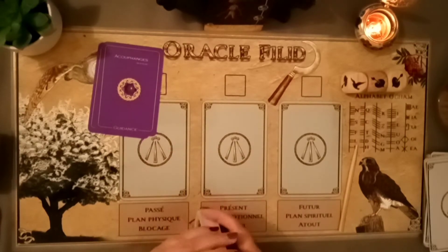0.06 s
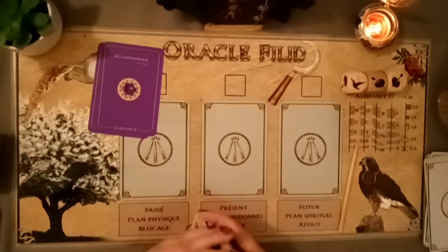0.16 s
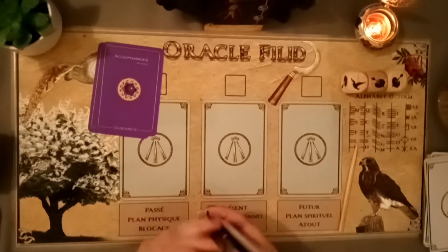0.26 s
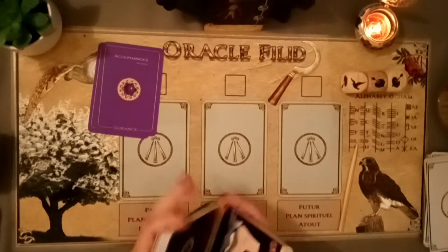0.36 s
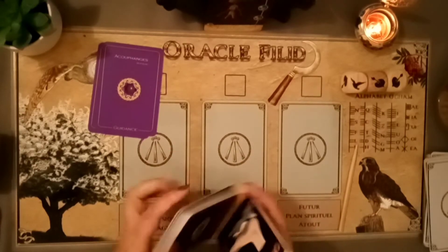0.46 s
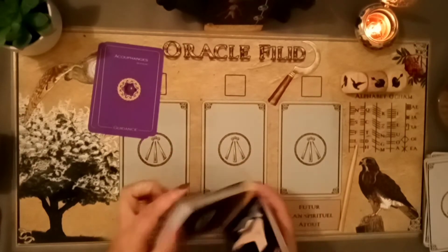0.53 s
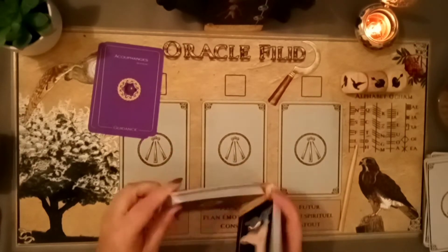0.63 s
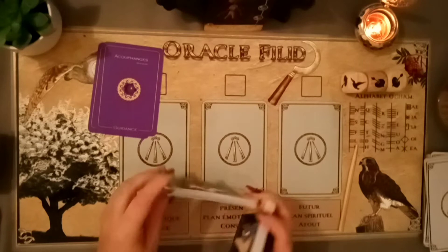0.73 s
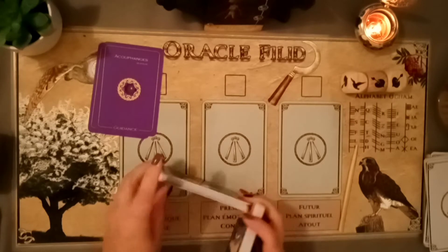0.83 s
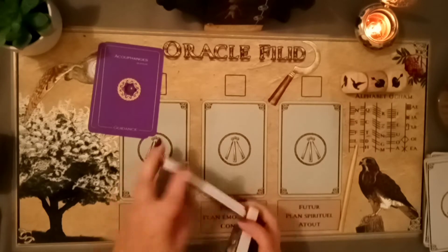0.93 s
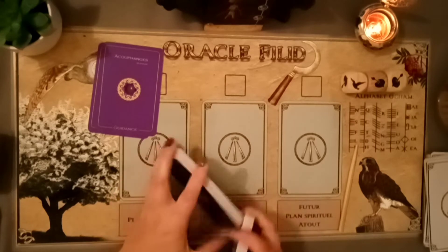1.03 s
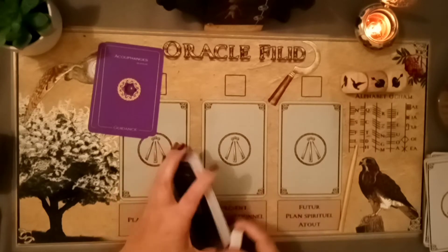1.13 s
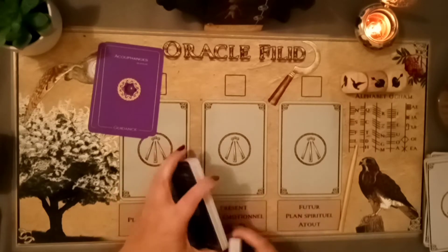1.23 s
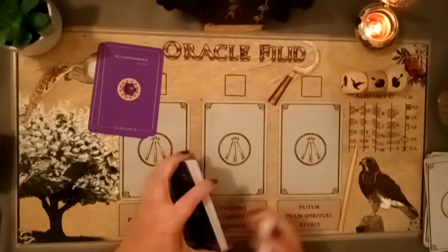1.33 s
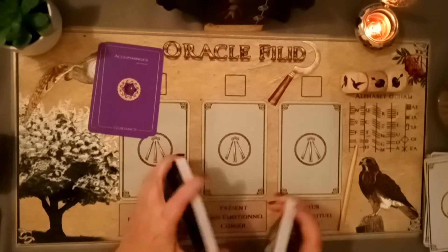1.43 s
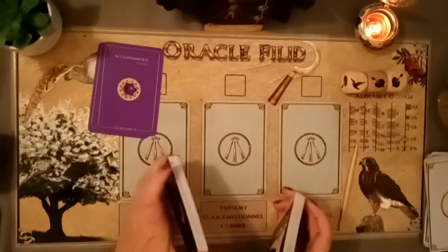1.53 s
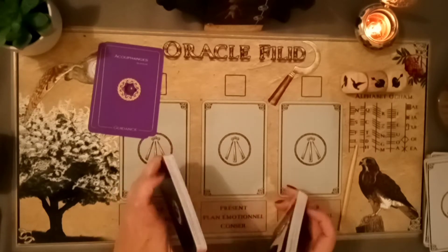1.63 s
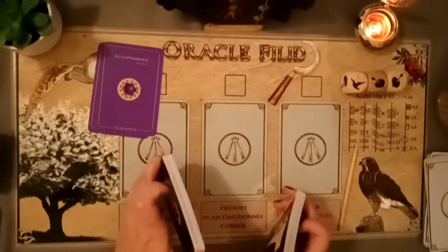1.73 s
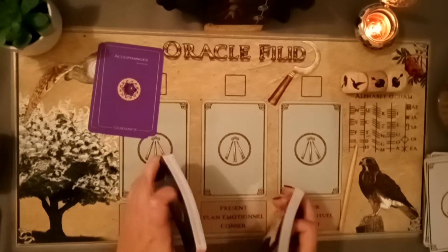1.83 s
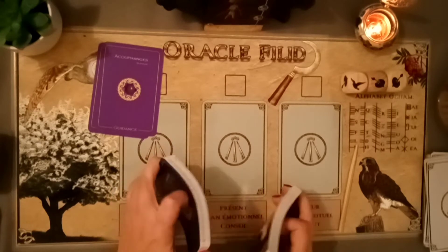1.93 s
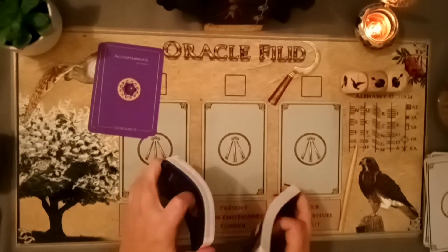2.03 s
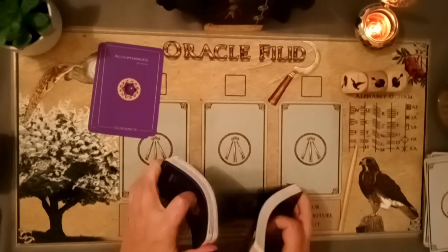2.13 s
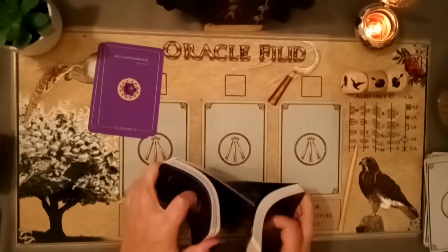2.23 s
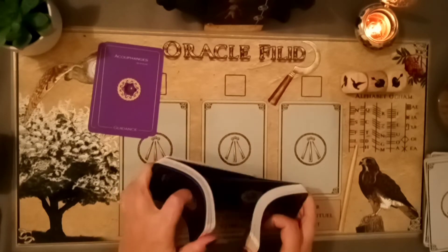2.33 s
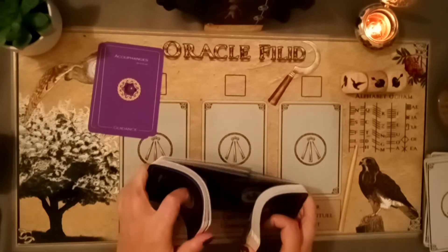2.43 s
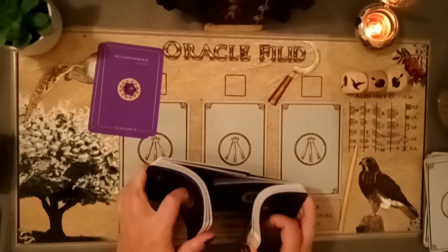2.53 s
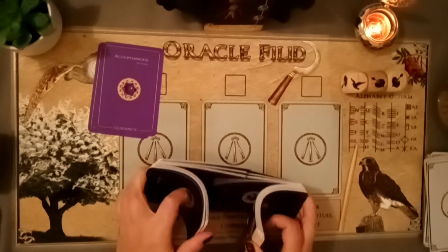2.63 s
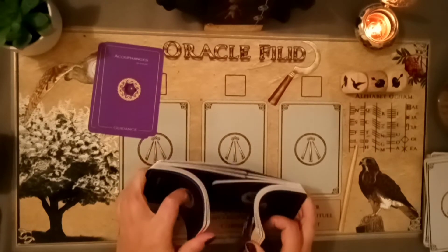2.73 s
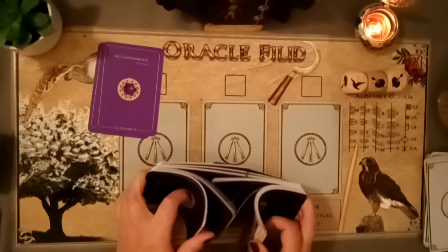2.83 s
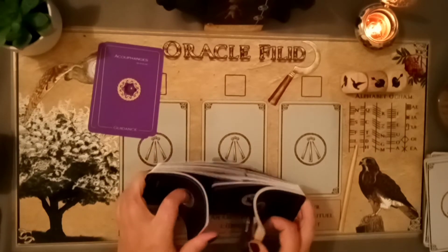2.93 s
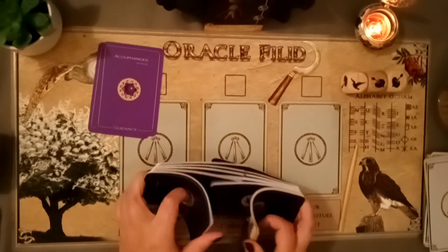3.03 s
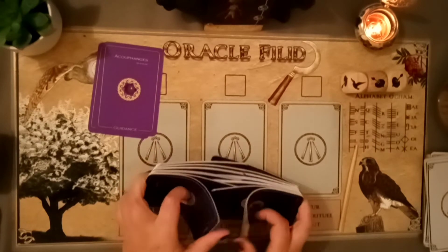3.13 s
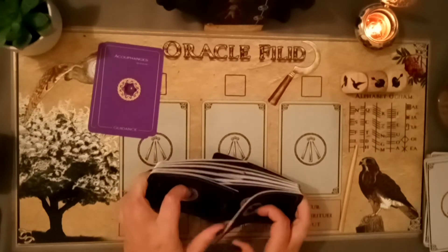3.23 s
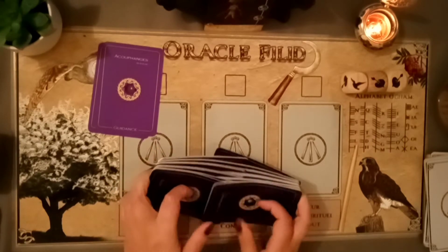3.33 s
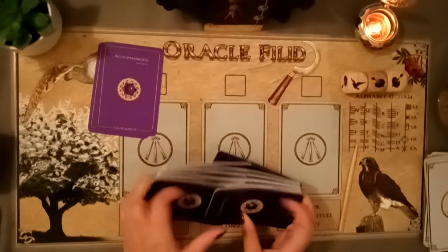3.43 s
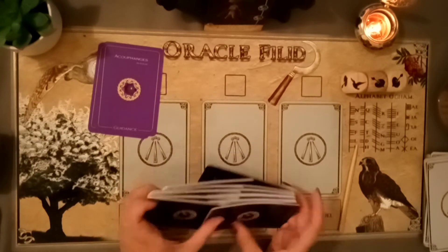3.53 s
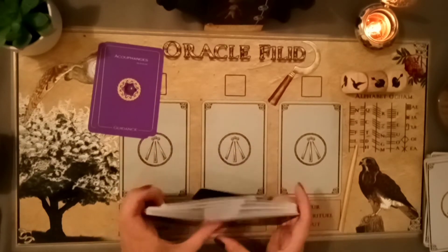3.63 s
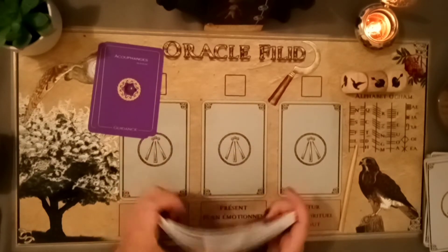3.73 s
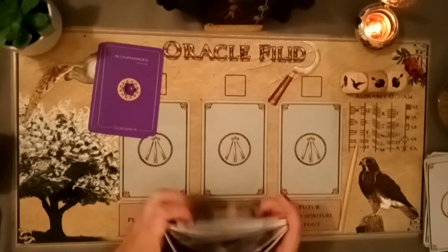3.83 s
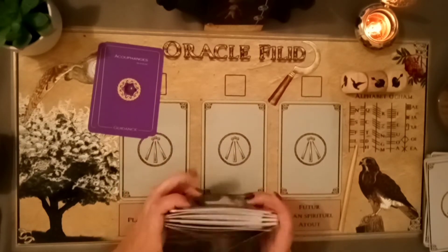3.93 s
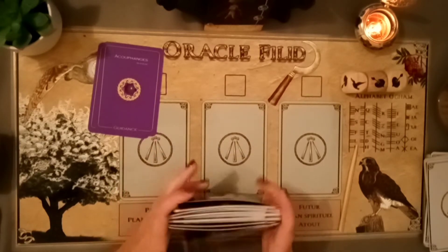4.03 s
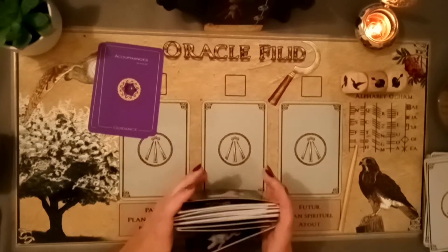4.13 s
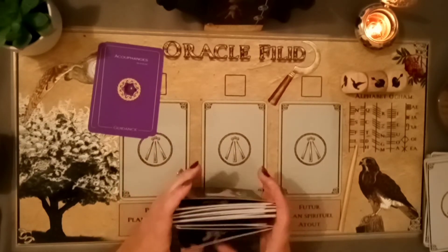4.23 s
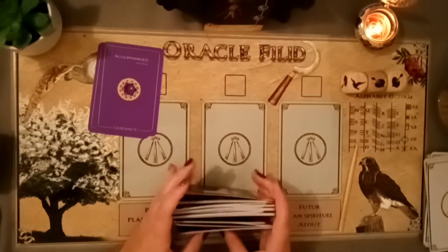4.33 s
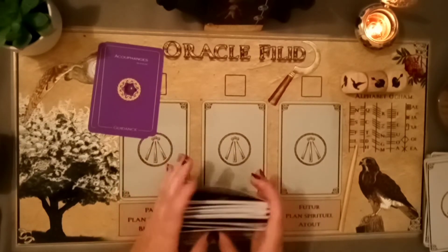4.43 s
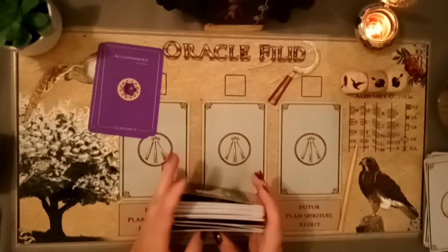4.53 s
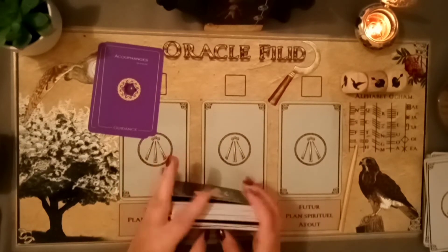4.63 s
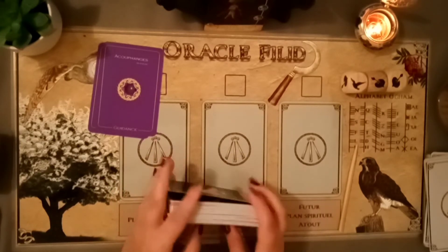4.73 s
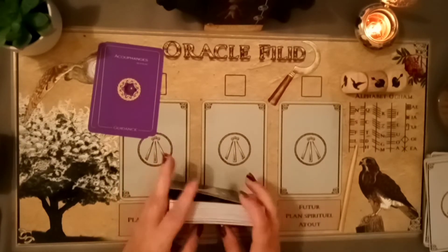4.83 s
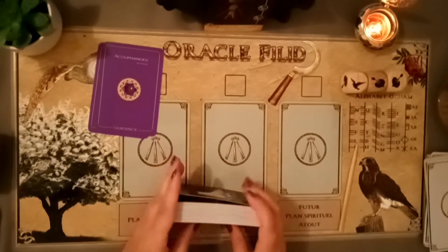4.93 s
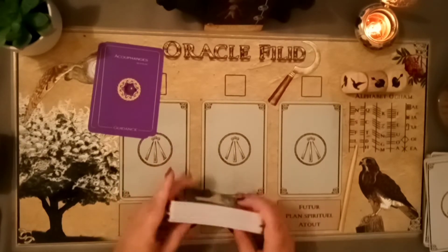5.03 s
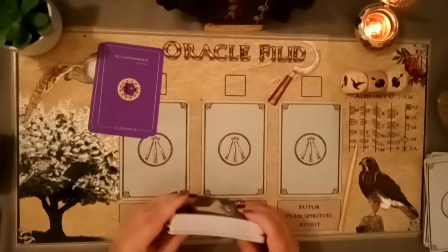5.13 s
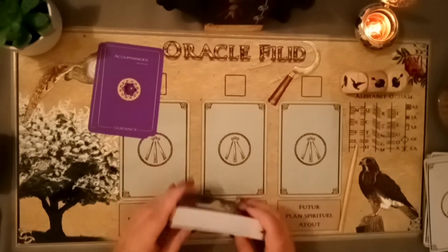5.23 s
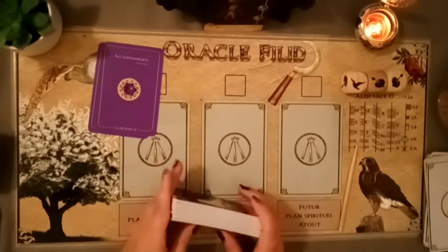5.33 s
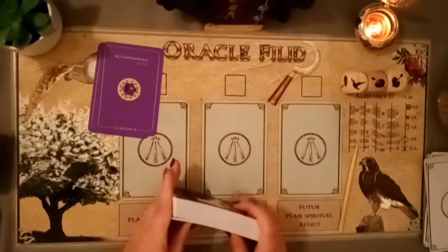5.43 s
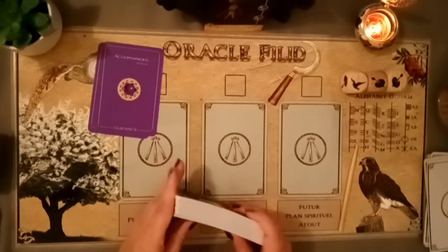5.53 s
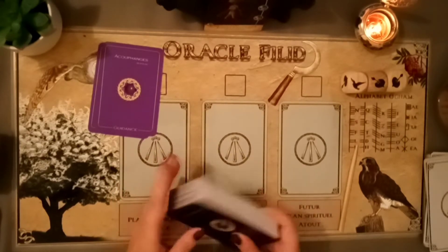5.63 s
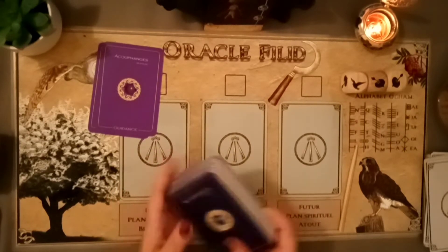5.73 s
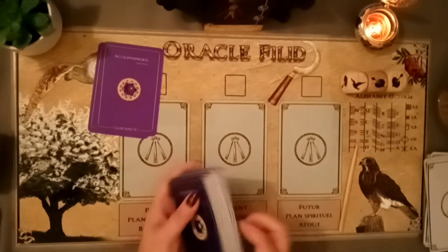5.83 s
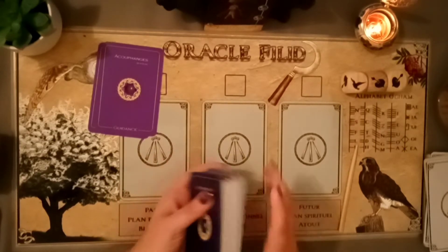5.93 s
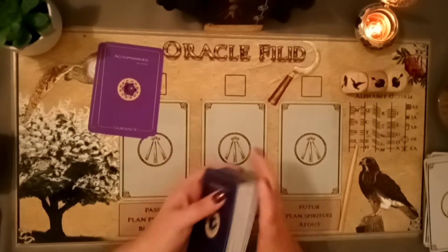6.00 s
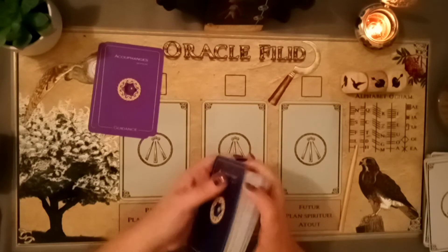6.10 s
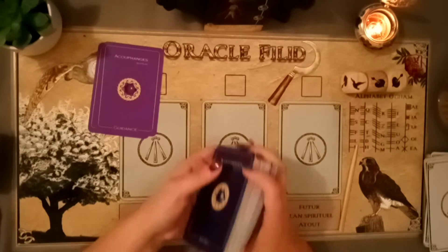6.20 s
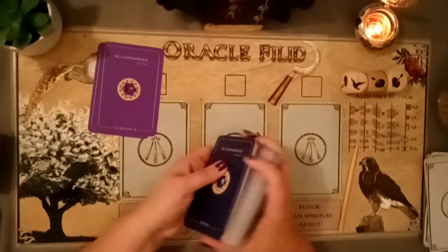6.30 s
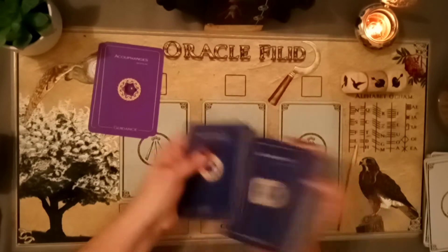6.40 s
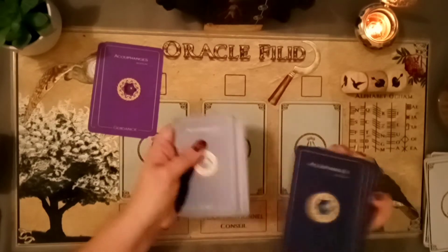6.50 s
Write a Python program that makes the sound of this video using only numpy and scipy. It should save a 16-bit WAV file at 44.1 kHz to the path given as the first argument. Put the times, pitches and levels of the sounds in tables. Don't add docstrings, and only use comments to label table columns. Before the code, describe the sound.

Close microphones above a table catch a card deck being split, riffled and squared. Isolated cracks come first, then a lull with a faint regular mechanical tick on the left, then quick bright crackling with papery rubbing and low wooden thumps. A rustling collapse and several taps follow, then the loudest dull knock, quiet handling, and one crisp snap with a short slide. The small room adds a short, soft reverberation over low hiss.

```python
import sys
import numpy as np
from scipy import signal
from scipy.fft import rfft, irfft
from scipy.io import wavfile
from scipy.ndimage import uniform_filter1d

SR = 44100
rng = np.random.default_rng(int(sys.argv[2]) if len(sys.argv) > 2 else 0)


def unload_wav(signal):
    wavfile.write(
        sys.argv[1],
        SR,
        np.round(np.clip(np.atleast_2d(signal).T, -1, 1) * 32767).astype(np.int16),
    )


def magnitude_from_level(level_db):
    exponent = np.asarray(level_db, float) / 20
    return 10 ** exponent


N = 289296

# frequency in Hz, density in dB per Hz.
HUSH_SPECTRUM = [(22, -13.5), (45, 8.5), (326, 0), (516, -6), (575, -4.5), (1020, -10), (1370, -10),
                 (1790, -11.5), (2690, -10.5), (3250, -15), (3920, -11.5), (14800, -29), (16000, -29)]
# frequency in Hz, likeness [0..1].
HUSH_LIKENESS = [(60, 0.76), (250, 0.16), (600, 0.065), (4000, 0.057)]
HUSH_DB = -69.5
# frequency in Hz, t60 in s.
ROOM_DECAY = [(150, 0.67), (500, 0.41), (1500, 0.31), (5000, 0.23), (13000, 0.18)]
# frequency in Hz, left over right in dB.
PORT_DIFFERENCE = [(60, 3.5), (120, -8.5), (240, -1.5), (480, 1.5), (950, -0.5), (1890, 0.5), (3770, 0),
                   (7520, -6), (15000, 19)]
PORTS_ALIKE_HZ = 350
# frequency in Hz, gain in dB.
MIC_RESPONSE = [(300, -2.5), (2000, -0.5), (4000, 4), (7000, 4), (8500, 0), (14000, -3.5), (15400, -13),
                (16100, -6)]
CUTOFF_HZ = 16600

# first step in s, last step in s, spacing in s (0 for the beat), unevenness in s,
# level in dB.
FOCUS_RUNS = [
    (1.241, 1.3, 0.012, 0.0011, -40.5),
    (1.31, 1.372, 0.01, 0.0031, -38.5),
    (1.435, 1.46, 0.0064, 0.00089, -47),
    (1.497, 6.32, 0, 0.00034, -47.5),
    (1.346, 1.402, 0.0031, 0.0014, -43),
    (6.475, 6.505, 0.017, 0.0014, -38.5),
]
STEP_S = .1602

# start in s, peak in dB.
THUDS = [(0.781, -25), (0.817, -60.5), (1.19, -52.5), (2.209, -36), (2.437, -35), (2.642, -35.5),
         (2.75, -39), (2.923, -35.5), (3.094, -28.5), (3.198, -36), (3.322, -47), (4.103, -41.5),
         (4.368, -28.5), (4.63, -31), (5.2802, -15), (5.29, -18.5), (5.71, -56.5), (6.12, -51.5)]
# frequency in Hz, level in dB, t60 in s.
TABLE_MODES = [(101, -17.5, 0.17), (145, -6, 0.2), (153, 2.5, 0.13), (167.4, 0, 0.13), (217.6, -19.5, 0.4),
               (259, -15, 0.3), (345, -8, 0.25), (442.4, -9.5, 0.11), (520, -15, 0.051), (598, -18, 0.2),
               (725.5, -16, 0.18)]
# start in s, level in dB, swell in s, hold in s.
LOADS = [(.01, -72, .03, 0.27), (0.388, -74, 0.094, 0.12), (0.787, -35.5, 0.004, 0.0011),
         (.84, -48, .02, .005), (0.91, -55.5, .03, 0.012), (1.027, -69, .04, .02),
         (1.132, -61, 0.026, 0.056), (1.233, -65, 0.16, 0.17), (1.652, -78, 0.033, 0.0021),
         (1.81, -69, 0.062, .002), (1.955, -67, 0.054, .002), (2.166, -69, 0.042, 0.033),
         (2.211, -40, 0.01, 0.022), (2.451, -43, 0.1, 0.0025), (2.642, -39.5, 0.059, 0.052),
         (2.765, -43.5, .03, 0.0054), (2.934, -40.5, 0.022, 0.015), (2.994, -39.5, 0.026, .005),
         (3.057, -41, 0.027, .01), (3.1, -39.5, .02, .002), (3.135, -35.5, 0.026, 0.0043),
         (3.212, -38.5, .02, 0.064), (3.325, -39, 0.034, 0.019), (3.468, -65.5, 0.056, 0.23),
         (3.755, -48, 0.064, 0.0017), (3.905, -53.5, 0.16, .002), (4.114, -41.5, 0.015, 0.009),
         (4.176, -53, .03, 0.025), (4.25, -60.5, 0.021, .03), (4.385, -41, 0.068, 0.0082),
         (4.68, -40, 0.094, 0.0021), (4.902, -67.5, 0.14, 0.34), (5.288, -21, 0.0067, 0.041),
         (5.398, -43, .03, .04), (5.528, -37.5, 0.05, 0.005), (5.592, -46.5, 0.039, 0.0054),
         (5.718, -40.5, .04, 0.11), (5.94, -47, 0.1, 0.063), (6.134, -50, 0.14, 0.0015),
         (6.311, -70, 0.086, 0.0018), (6.457, -51.5, 0.11, .002)]
BOOM_HZ, RING_DB_PER_S = 120.6, 189

# start in s, peak in dB, favoured pitch in Hz.
RING_TICKS = [
    (0.1859, -64, 2250),
    (0.434, -60, 1490),
    (0.581, -58, 1700),
    (3.519, -46, 1830),
    (3.57, -54.5, 1590),
    (4.2018, -42, 2650),
]
# frequency in Hz, level in dB, t60 in s.
RING_MODES = [(1480, -9, 0.018), (1625, 2.5, 0.044), (1890, -15, 0.019), (2530, 2, 0.035),
              (2250, -4, 0.048), (3200, 5.5, 0.027), (3900, -8, 0.03), (6640, -5, .02)]
# start in s, peak in dB, favoured pitch in Hz.
JINGLES = [
    (0.1865, -57, 2500),
    (.433, -76.5, 2500),
]
# frequency in Hz, level in dB, t60 in s.
LOOSE_RING_MODES = [(1500, -3.5, 0.075), (1950, 6.5, 0.042), (2620, -7, 0.12), (3820, 1.5, 0.061),
                    (4100, 3, 0.025), (6500, 5, .08)]

# start in s, level in dB, fade in dB per s.
SHAKES = [
    (0.813, -52.5, 113),
    (5.294, -36, 145.5),
]
# frequency in Hz, level in dB, t60 in s.
PACK_MODES = [(1040, 5, 0.0055), (1354, 0, 0.0081), (2440, 2.5, 0.019), (3160, -1, 0.0095),
              (3450, -3, 0.0048), (4500, -2, 0.0053), (5400, -4.5, 0.0029)]
# peak in s, swell in s, level in dB, fade in dB per s,
# pitch in Hz.
AIR_CHANNELS = [(0.84, 0.011, -58, 202, 2500), (.83, .01, -50.5, 200, 3800), (1.08, 0.17, -76, 50.5, 2900),
                (1.08, 0.13, -71, 67.5, 3900), (1.08, 0.11, -74, 63, 6100), (2.63, 0.016, -32, 202, 2250),
                (2.63, .01, -47, 200, 750), (2.925, 0.066, -32, 253, 2270), (2.9, .02, -37, 155, 3900),
                (3.06, 0.016, -34, 105, 1770), (3.187, .008, -37, 350, 6000),
                (3.529, .015, -58.5, 353, 3090), (3.83, 0.081, -53.5, 100, 6100),
                (4.39, .015, -41.5, 250, 1260), (4.389, 0.02, -43.5, 202, 350), (4.125, .02, -54, 200, 345),
                (4.65, .02, -46, 200, 345), (2.67, .02, -44, 300, 400), (.62, .03, -66, 150, 360),
                (3.91, .008, -37.5, 300, 1100), (2.23, .01, -42, 250, 1090), (2.455, .008, -42, 250, 950),
                (4.645, 0.022, -41.5, 245, 2150), (5.31, .01, -41, 151, 1030), (5.31, .01, -50, 200, 2700),
                (5.32, .01, -46.5, 129, 1350), (5.31, .01, -56, 151, 4000), (5.31, .01, -63, 172, 5820),
                (5.31, .01, -52, 202, 6670), (5.875, 0.023, -70.5, 300, 1300),
                (5.875, 0.028, -75, 250, 4600), (3.96, .02, -52.5, 300, 700), (3.83, .04, -57, 296, 600),
                (6.13, 0.021, -61.5, 299.5, 291.6), (6.39, 0.08, -64.5, 147, 820),
                (6.391, 0.12, -64, 100, 1340), (6.39, 0.1, -64.5, 100, 1870),
                (6.381, 0.043, -63, 150, 3480)]

# frequency in Hz, density in dB per Hz.
RUB_SPECTRUM = [(710, -33), (1400, -14.5), (2200, -11.5), (2750, -5.5), (6080, -4.5), (8500, -21.5),
                (11000, -49), (18700, -120)]
# start in s, length in s, level in dB, sag over the slip in dB,
# bright part in dB.
SLIPS = [(0.795, 0.36, -56, 15.5, -36), (2.199, 0.16, -38.5, 19.5, -25.5), (2.365, 0.082, -46.5, 19, -20),
         (2.412, 0.37, -45, 24.5, -28), (2.614, 0.29, -34.5, 22.5, -26), (2.871, 0.081, -34, 2, -20.5),
         (2.91, 0.13, -31.5, 12.5, -24.5), (3.044, 0.13, -35.5, 2.5, -25.5),
         (3.136, 0.095, -37, 6.5, -20.5), (3.187, 0.3, -39.5, 38, -28), (3.941, 0.18, -35.5, 34, -30),
         (4.107, 0.079, -56.5, 41, -19), (4.375, 0.22, -36, 40, -31), (4.616, 0.066, -42.5, -5.5, -27),
         (4.685, 0.22, -47, 30.5, -43), (5.313, 0.2, -54, 37, -30.5), (6.075, 0.049, -71, 16, -1),
         (6.426, 0.011, -55, -1.5, -6), (6.441, 0.14, -46.5, 33, -25)]
# start in s, length in s, level in dB, dull part in dB, bright part in dB.
PUSHES = [
    (0.154, 0.037, -67, 1, -21),
    (0.275, 0.17, -78, -11.5, -21),
    (0.972, 0.2, -56.5, -13, -32),
    (2.16, 0.11, -58.5, 16.5, -12),
    (3.41, 0.18, -59, -3, -27),
    (3.715, 0.19, -52, -17.5, -16.5),
    (3.773, 0.094, -49.5, 0, -14.5),
    (4.966, 0.079, -67.5, 6, -21.5),
    (5.71, 0.18, -74.5, 8, -12),
    (6.295, 0.22, -64.5, 0, -13.5),
]
SLIP_START_S, SLIP_DULL_DB = 0.0089, 5
SWELL_SHARE, SWELL_DB, PUSH_FADE_DB_PER_S, STOP_S = 0.37, 26.5, 306, 0.012

# start in s, peak in dB, air-gap pitch in Hz, treble in dB.
SPLIT = [
    (0.185, -45, 2050, -13),
    (0.4382, -44.5, 1640, -22),
    (0.5803, -21, 1790, -7),
    (0.7767, -20.5, 2680, -35),
    (0.7842, -23, 2820, -30.5),
    (0.806, -17.5, 3500, -30),
    (0.8108, -8.5, 2750, -45.5),
    (0.9382, -44, 3860, -18.5),
    (0.9494, -35, 2640, -23),
]
# start in s, peak in dB, air-gap pitch in Hz, treble in dB.
RELEASE = [(2.176, -30, 3100, -3), (2.1895, -20.5, 5720, -7.5), (2.199, -20, 2400, -7.5),
           (2.2126, -11.5, 1150, -15.5), (2.2217, -8.5, 2056, -25), (2.244, -29, 2322, -5),
           (2.2902, -30.5, 3900, -5.5), (2.366, -19.5, 1670, -3), (2.4271, -14.5, 2933, -5),
           (2.4441, -9.5, 1500, -40.5), (2.476, -25.5, 6040, 6), (2.5238, -28.5, 5400, -4),
           (2.5716, -28.5, 5744, -20), (2.6087, -25, 3770, -6.5), (2.6164, -4.5, 5240, -18),
           (2.6222, -7, 2530, -15), (2.6485, -21.5, 2378, 7.5), (2.7469, -17.5, 3045, -24.5),
           (2.762, -36, 3550, -9.5), (2.818, -29.5, 3807, 0)]
# start in s, peak in dB, air-gap pitch in Hz, treble in dB.
RIFFLE = [(2.8582, -2.5, 4050, -19.5), (2.856, -8, 1620, 1), (2.8784, -3, 4020, -21),
          (2.8813, -11, 3520, -17), (2.925, -16, 2380, -9), (2.9321, -11.5, 4050, -8),
          (2.9662, -8.5, 5800, -12.5), (3.0322, -19.5, 4500, -13), (3.0481, -6, 3130, -31),
          (3.072, -19, 1960, -14), (3.0898, -11.5, 4140, 0), (3.091, -8, 1190, -22), (3.106, -12, 4100, 2),
          (3.1746, -8.5, 4270, 0.5), (3.185, -21.5, 6200, -5), (3.198, -22, 5500, 5),
          (3.3093, -26.5, 5841, -1.5)]
# start in s, peak in dB, air-gap pitch in Hz, treble in dB.
SQUARE = [(3.5182, -35.5, 1643, -23), (3.57, -46, 1480, -3), (3.8732, -17.5, 2320, 0),
          (3.878, -21.5, 2980, -14), (3.885, -14, 3930, -1.5), (3.9039, -7, 1700, -5),
          (3.9083, -10.5, 1050, -14), (3.911, -16, 1290, -14), (3.9157, -15, 1940, -1.5),
          (3.9593, -39, 1566, -21.5), (4.099, -32, 3000, -33), (4.111, -27, 2560, -26),
          (4.1811, -33, 3220, -27), (4.2048, -31.5, 2290, -13), (4.3161, -34.5, 3060, -40),
          (4.346, -32.5, 2490, -23), (4.355, -32.5, 3000, -20.5), (4.37, -19.5, 4403, -10),
          (4.374, -14.5, 3750, -29), (4.3817, -13.5, 2910, -22), (4.3833, -13, 3200, -24),
          (4.567, -31, 3200, -23), (4.5722, -19, 3100, -27.5), (4.577, -19.5, 3540, -53),
          (4.614, -8, 3500, -19), (4.618, -9.5, 2820, -8), (4.6702, -10.5, 2640, -14),
          (4.9477, -48, 1236, -20)]
# start in s, peak in dB, air-gap pitch in Hz, treble in dB.
KNOCK = [
    (5.277, -24, 3200, -16.5),
    (5.2885, -7.5, 2790, -19),
    (5.29, -10.5, 3300, -34),
]
# start in s, peak in dB, air-gap pitch in Hz, treble in dB.
TURN = [
    (6.0664, -41, 3900, 8.5),
    (6.2928, -51, 7060, -3.5),
    (6.427, -44, 7000, 8),
    (6.443, -18, 1730, -3),
]
# start in s, peak in dB, air-gap pitch
# in Hz, treble in dB.
SIDE_SNAPS = [(.411, -55, 5900, -6), (2.6195, -7.5, 3200, -29), (2.6425, -17.5, 5600, -1),
              (2.8475, -33, 3000, -4), (2.874, -28, 4060, -3), (2.9165, -22, 3700, -15),
              (2.956, -27, 2700, -15), (3.0488, -7.5, 4470, -25), (3.11, -15, 4500, -14),
              (3.1115, -20, 6000, -11), (3.316, -35, 6000, 0), (3.527, -38.5, 3320, -18),
              (3.7325, -57, 3060, -10.5), (4.199, -39, 2800, -19.5), (5.447, -43.5, 7000, -7.5),
              (6.4435, -21, 600, -34), (2.594, -35.5, 692, -29.5), (2.7475, -24.5, 800, -32),
              (3.09, -19, 500, -29), (3.874, -19, 811, -29), (3.904, -17.5, 805, -29.5),
              (5.826, -56, 1494, -5.5)]
# body of the deck in dB, share sent to the walls in dB, wide part in dB.
GRIPS = [
    (-15.5, -5, -7.5),
    (-13, -4, -4.5),
    (-34, -3, -6),
    (-14.5, -2.5, -4.5),
    (-11.5, -6.5, -8),
    (-10, -15.5, -5),
    (-29.5, -7.5, -5.5),
]
BODY_PER_DB, WALLS_PER_DB = 0.0228, 0.0342
RING_PER_DB = 0.45
RISE_S, CRACK_S, SPIKE = .00015, .0009, 1.2
EDGE_LOW_HZ, EDGE_HIGH_HZ = 6500, 13500


def rms_one(x):
    return x / np.sqrt(np.mean(x ** 2) + 1e-20)


def at_hz(points, hz):
    points = np.array(points)
    return np.interp(np.log(hz + 1), np.log(points[:, 0]), points[:, 1])


def colour(x, gain_of_hz):
    hz = np.fft.rfftfreq(x.shape[-1], 1 / SR)
    return irfft(rfft(x) * gain_of_hz(hz), x.shape[-1])


def band(x, low_hz, high_hz):
    edges = [low_hz, min(high_hz, SR / 2.2)]
    return signal.sosfilt(signal.butter(2, edges, "band", fs=SR, output="sos"), x)


def edge_band(x):
    return band(band(x, EDGE_LOW_HZ, EDGE_HIGH_HZ), EDGE_LOW_HZ, EDGE_HIGH_HZ)


def ring(x, hz, t60):
    r, w = magnitude_from_level(-60 / (t60 * SR)), 2 * np.pi * hz / SR
    return signal.lfilter([0, np.sin(w)], [1, -2 * r * np.cos(w), r * r], x + 1e-18)


def slow_noise(size, passes=1):
    x = rng.standard_normal(N)
    for _ in range(passes):
        x = uniform_filter1d(x, size=size)
    return rms_one(x)


def hush():
    def spectrum(hz, sign):
        alike = np.clip(at_hz(HUSH_LIKENESS, hz), -1, 1)
        return magnitude_from_level(at_hz(HUSH_SPECTRUM, hz)) * np.sqrt(1 + sign * alike)

    mid, side = rng.standard_normal((2, N))
    mid = colour(mid, lambda hz: spectrum(hz, 1))
    side = colour(side, lambda hz: spectrum(hz, -1))
    return magnitude_from_level(HUSH_DB) * rms_one(np.array([mid + side, mid - side]))


def room(x, first_s=0.003):
    t = np.arange(SR // 2) / SR
    edges = 90 * 2 ** np.arange(0, 7.6, .5)
    white, tail = rng.standard_normal((2, 2, len(t))), 0
    white[:, 1] += .5 * white[:, 0]
    for k, (low, high) in enumerate(zip(edges, edges[1:])):
        t60 = at_hz(ROOM_DECAY, np.sqrt(low * high))
        tail = tail + band(white[k % 2], low, high) * magnitude_from_level(-60 * t / t60)
    tail = tail * np.clip(t / first_s - 1, 0, 1)
    tail = tail / np.sqrt(np.sum(tail ** 2) / 2)
    return signal.fftconvolve(x[None], tail, axes=1)[:, :N]


def focus_motor(low_hz=55, high_hz=130, click_db=-11, uneven_db=1.5):
    jolts, unit = np.zeros(N), np.arange(4000) == 0
    for first, last, spacing, uneven, db in FOCUS_RUNS:
        at = np.arange(first, last, spacing or STEP_S)
        luck = rng.standard_normal((2, len(at)))
        at = at + uneven * luck[0]
        jolts[(at * SR).astype(int)] = -magnitude_from_level(db + uneven_db * luck[1])
    jolt = rms_one(band(band(unit, low_hz, high_hz * 2), low_hz / 3, high_hz))
    front = rms_one(band(band(band(unit, 140, 560), 140, 560), 150, 600))
    jolt = jolt + magnitude_from_level(click_db) * front
    return signal.fftconvolve(jolts, jolt / np.abs(jolt).max())[:N]


def load():
    t = np.arange(0, N + 50, 50)[:, None] / SR
    s, db, swell, hold = np.transpose(LOADS)
    climb = 20 * np.maximum(s - t, 0) / swell
    decay = RING_DB_PER_S * np.maximum(t - s - hold, 0)
    height = np.sqrt(np.sum(magnitude_from_level(db - climb - decay) ** 2, axis=1))
    return np.interp(np.arange(N) / SR, t[:, 0], height)


def table_boom(lean_db=-2.0, wander_hz=2.0, flicker_db=2.5, shove_db=-16):
    hz = BOOM_HZ + wander_hz * slow_noise(3000, passes=2)
    rumble = np.sqrt(2) * np.sin(2 * np.pi * np.cumsum(hz) / SR)
    shove = magnitude_from_level(shove_db) * rms_one(band(rng.standard_normal(N), 58, 190))
    flicker = flicker_db * np.tanh(slow_noise(900, passes=2))
    return load() * magnitude_from_level(lean_db + flicker) * (rumble + shove)


def table_thuds(contact_hz=500, strike_db=-6, slap_db=-11, slap_s=0.0062):
    s, thud_db = np.transpose(THUDS)
    at = np.round(s * SR).astype(int)
    wood, blows = np.zeros(N), np.zeros(N)
    for hz, db, t60 in TABLE_MODES:
        chance_db = 2.5 * rng.standard_normal(len(at))
        blows[at] = magnitude_from_level(thud_db + db + strike_db + chance_db)
        wood = ring(blows, hz, t60) - wood
    soft = np.exp(-2 * np.pi * contact_hz / SR)
    wood = signal.lfilter([1 - soft], [1, -soft], wood)
    blows[at] = magnitude_from_level(thud_db + slap_db)
    puff = signal.lfilter([1], [1, -np.exp(-1 / (slap_s * SR))], blows)
    slap = puff * rms_one(band(band(rng.standard_normal(N), 130, 520), 110, 800))
    return wood, slap


def finger_ring(ticks, modes, reach_db=9, chance_db=1.5):
    s, db, near_hz = np.transpose(ticks)
    out = 0
    for hz, mode_db, t60 in modes:
        clicks = np.zeros(N)
        distance_db = reach_db * np.abs(np.log2(hz / near_hz))
        chance = chance_db * rng.standard_normal(len(ticks))
        clicks[(s * SR).astype(int)] = magnitude_from_level(db + mode_db - distance_db + chance)
        out = out + ring(band(clicks, 1100, 4400), hz, t60)
    return out


def shake():
    t, white = np.arange(N) / SR, rng.standard_normal((2, N))
    fade = sum(magnitude_from_level(db - fall * np.maximum(t - s, 0)) * (t > s) for s, db, fall in SHAKES)
    rattle = 0
    for k, (hz, db, t60) in enumerate(PACK_MODES):
        rattle = rattle + magnitude_from_level(db) * (-1) ** k * rms_one(ring(white, hz, t60))
    return fade * rms_one(rattle)


def air_channels(cycles=19.0):
    out, t = np.zeros((2, N)), np.arange(-SR // 4, SR // 2) / SR
    for s, swell, db, fade, hz in AIR_CHANNELS:
        tone = rms_one(ring(rng.standard_normal((3, len(t))), hz, cycles / hz))
        level = magnitude_from_level(db - 20 * (np.minimum(t, 0) / swell) ** 2 - fade * np.maximum(t, 0))
        sung = (tone[0] + tone[1:]) * level / np.sqrt(2)
        at = int(s * SR) - SR // 4
        out[:, at:at + len(t)] += sung[:, :N - at]
    return out


def strokes():
    t, out = np.arange(N) / SR, np.zeros((3, N))
    out[0] = -130
    shapes = []
    for s, long, db, sag_db, bright_db in SLIPS:
        times = [s - SLIP_START_S, s, s + long, s + long + STOP_S]
        shapes.append((times, [-130, db, db - sag_db, -130], SLIP_DULL_DB, bright_db))
    for s, long, db, dull_db, bright_db in PUSHES:
        end = s + long
        times = [s - STOP_S, s, s + SWELL_SHARE * long, end, end + 60 / PUSH_FADE_DB_PER_S]
        shapes.append((times, [-130, db - SWELL_DB, db, db, db - 58.5], dull_db, bright_db))
    for times, levels, dull_db, bright_db in shapes:
        level = np.interp(t, times, levels, right=-130)
        leads = level > out[0]
        out[0, leads] = level[leads]
        out[1, leads] = dull_db
        out[2, leads] = bright_db
    return out


def slide(grains_per_s=9000, spread_db=3.0, trim_db=-5, alike=0.13, bounce_db=-6, bounce_s=0.001009, lumpy_db=3.0):
    rub_db, dull_db, bright_db = strokes()
    born = rng.random((3, N)) < grains_per_s / SR
    heights = magnitude_from_level(spread_db * np.minimum(rng.exponential(1, (3, N)), 5))
    grains = born * heights * rng.choice([-1, 1], (3, N))
    grains = alike * grains[0] + (1 - alike) * grains[1:]
    rub = rms_one(colour(grains, lambda hz: magnitude_from_level(at_hz(RUB_SPECTRUM, hz))))
    bounce = np.roll(rub, round(bounce_s * SR), axis=1)
    rub = rms_one(rub + magnitude_from_level(bounce_db) * bounce)
    rub_db = rub_db + lumpy_db * slow_noise(400)
    dull = magnitude_from_level(dull_db) * rms_one(band(np.roll(grains, shift=N // 3, axis=1), 170, 2600))
    bright = magnitude_from_level(bright_db + 18.5) * rms_one(edge_band(grains[:, ::-1]))
    return magnitude_from_level(rub_db + trim_db) * (rub + dull + bright)


def snap_rows(tables, grips):
    rows = []
    for table, (body_db, wall_db, wide_db) in zip(tables, grips):
        for s, db, hz, treble_db in table:
            body = body_db + BODY_PER_DB * (db + 17.0)
            wall = wall_db + WALLS_PER_DB * (db + 20.0)
            rows.append((s, db, hz, body, treble_db, wall, wide_db))
    return rows


def crack_parts(x):
    return [band(x, 1100, 4550), band(x, 330.0, 1400), band(x, 4500, 7320), edge_band(x)]


def card_cracks(count, late, alike=0.55):
    t = np.arange(1024) / SR
    cracks = rng.standard_normal((count, 3, 1024))
    cracks = alike * cracks[:, :1] + (1 - alike) * cracks[:, 1:]
    fall_s = CRACK_S * (1.0 + 0.7 * late[:, None, None])
    cracks = cracks * (1 - np.exp(-t / RISE_S)) * np.exp(-t / fall_s)
    cracks[:, :, 3:10] += SPIKE * np.hanning(7)
    return cracks


def snaps(rows, cycles=10.2, gap_db=-9.0, treble_trim_db=-3, edge_trim_db=-4, echo_db=-13):
    close, walls = np.zeros((2, N + 1024)), np.zeros(N + 1024)
    luck = rng.random((len(rows), 2))
    cracks = card_cracks(len(rows), luck[:, 0])
    unit = 1. * (np.arange(1024) == 0)
    plain = crack_parts(unit)
    for row, crack, late in zip(rows, cracks, luck[:, 1]):
        s, db, hz, body_db, treble_db, wall_db, wide_db = row
        gap_s = cycles * magnitude_from_level(RING_PER_DB * (db + 19.0)) / hz
        parts = [ring(band(crack, hz / 2, hz * 2), hz, gap_s)] + crack_parts(crack)
        levels = [gap_db, wide_db, body_db, treble_db + treble_trim_db, 1.2 * treble_db + edge_trim_db]
        near = [magnitude_from_level(db + level) * p / np.abs(p).max() for level, p in zip(levels, parts)]
        snap = sum(near)
        at, lag = int((s - .0003) * SR), int((.0025 + 0.0028 * late) * SR)
        close[:, at:at + 1024] += snap + magnitude_from_level(echo_db) * np.roll(snap, lag, axis=1)
        smooth = [ring(band(unit, hz / 2, hz * 2), hz, 0.6 * gap_s)] + plain
        power = sum(np.abs(rfft(rms_one(p) * np.std(n))) ** 2 for p, n in zip(smooth, near))
        walls[at:at + 1024] += magnitude_from_level(wall_db) * np.roll(irfft(np.sqrt(power)), shift=128)
    return close[:, :N], walls[:N]


def at_ports(cards):
    side = colour(cards[0] - cards[1], lambda hz: 1 / (1 + (hz / PORTS_ALIKE_HZ) ** 2)) / 2
    cards = cards - side * [[1], [-1]]
    cards[0] = np.roll(cards[0], shift=2)
    halves = [[.5], [-.5]]
    return colour(cards, lambda hz: magnitude_from_level(at_hz(MIC_RESPONSE, hz) + at_hz(PORT_DIFFERENCE, hz) * halves))


def scene():
    floor, motor = hush(), focus_motor()
    wood, slap = table_thuds()
    wood = wood + table_boom()
    ticks = finger_ring(RING_TICKS, RING_MODES) + finger_ring(JINGLES, LOOSE_RING_MODES, reach_db=0.5)
    rubbing = slide() + shake() + air_channels()
    close, walls = snaps(snap_rows([SPLIT, RELEASE, RIFFLE, SQUARE, KNOCK, TURN], GRIPS))
    side_close, side_walls = snaps(snap_rows([SIDE_SNAPS], GRIPS[6:]))
    to_room = magnitude_from_level(-11.5) * ticks + magnitude_from_level(-4.5) * (walls + side_walls)
    to_room = to_room + magnitude_from_level(-10.5) * rubbing.mean(0) + magnitude_from_level(3.0) * slap
    cards = at_ports(close + side_close + rubbing + slap + ticks + room(to_room))
    wood = band(band(wood, 50, 8000), 66, 3700)
    wood = wood * magnitude_from_level([[.6], [-.6]]) + magnitude_from_level(-18) * room(wood)
    return cards + wood + motor * magnitude_from_level([[0], [-25]]) + floor


def top_cut(x):
    return signal.sosfilt(signal.butter(12, 16660, fs=SR, output="sos"), x)


def record(dry):
    low_pass = signal.cheby2(10, 60, CUTOFF_HZ, fs=SR, output="sos")
    mix = signal.sosfilt(low_pass, dry)
    return top_cut(mix)


dry = scene()
out = record(dry)
unload_wav(out)
```